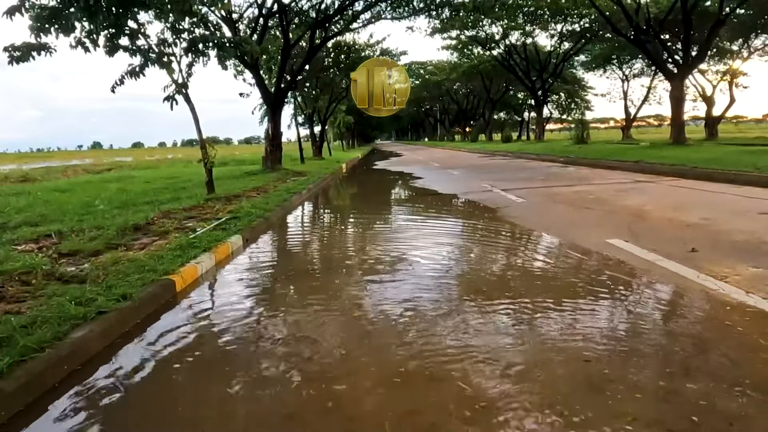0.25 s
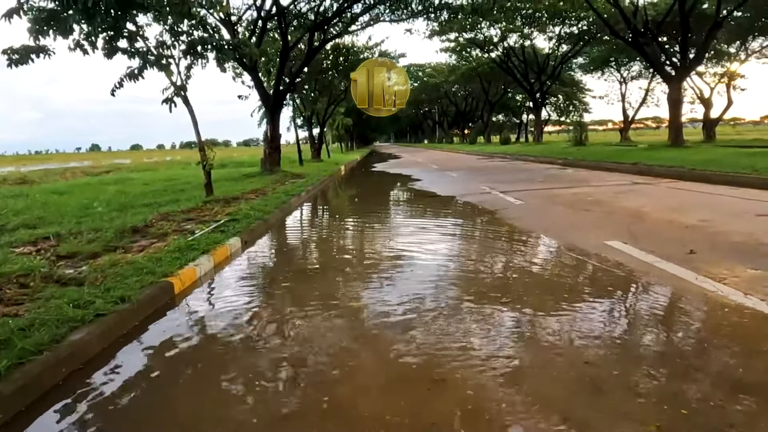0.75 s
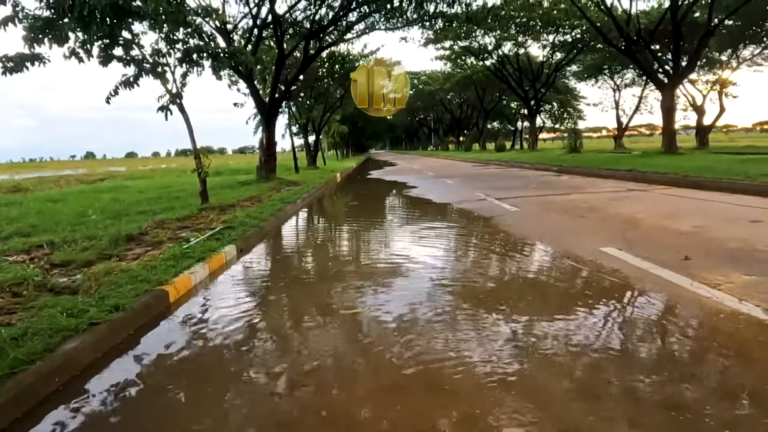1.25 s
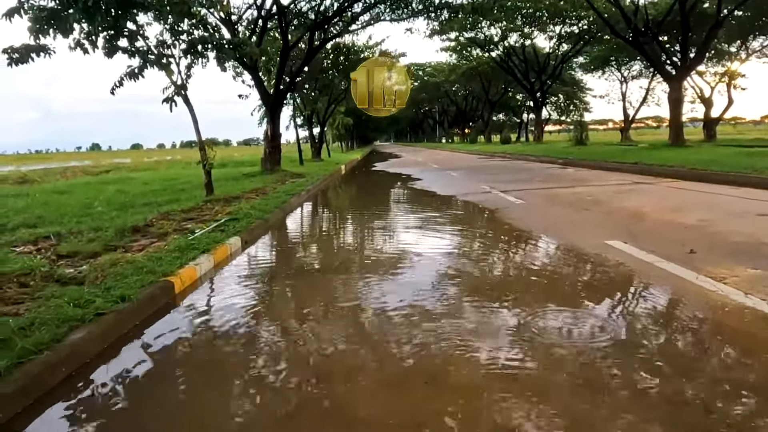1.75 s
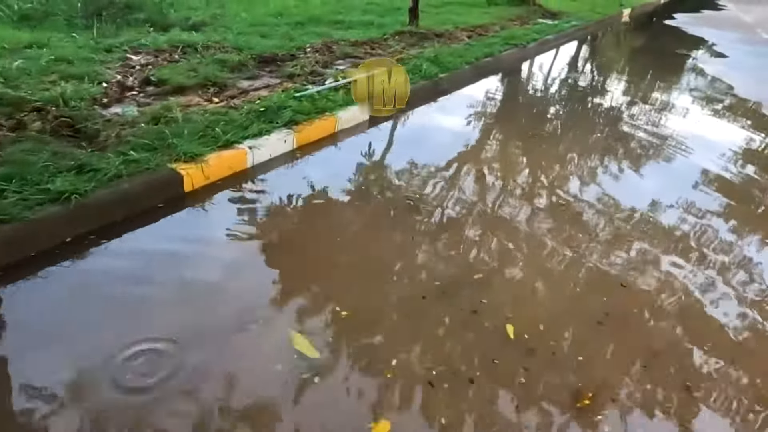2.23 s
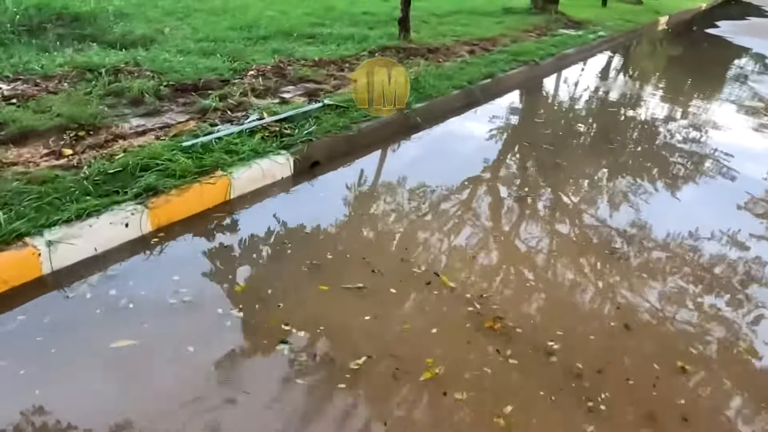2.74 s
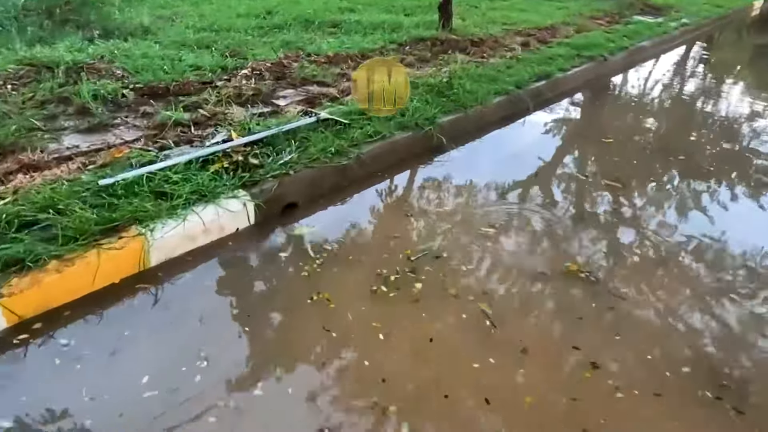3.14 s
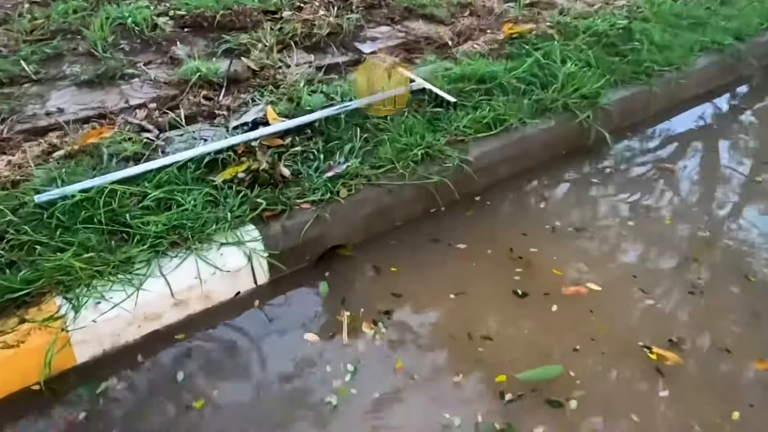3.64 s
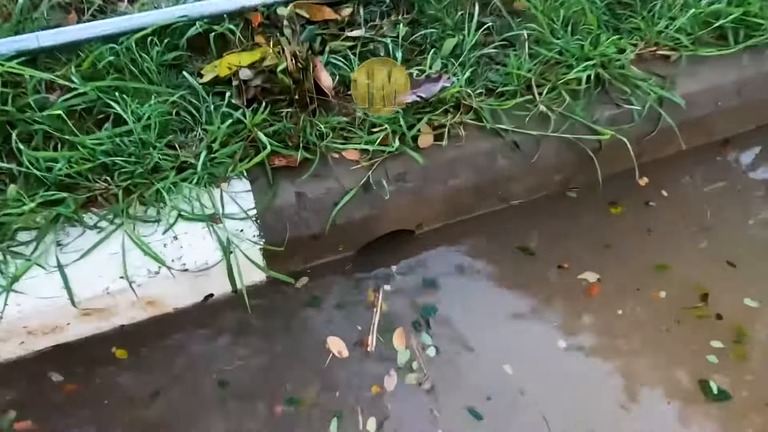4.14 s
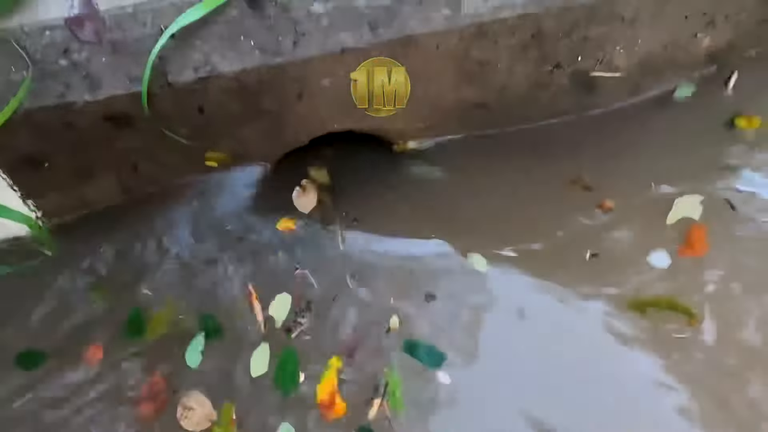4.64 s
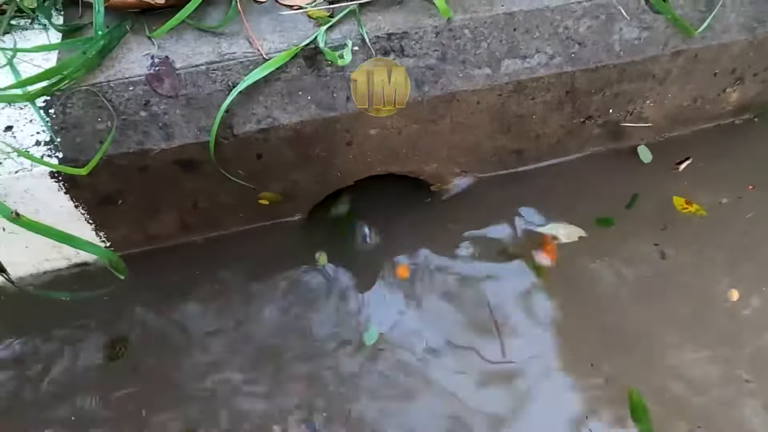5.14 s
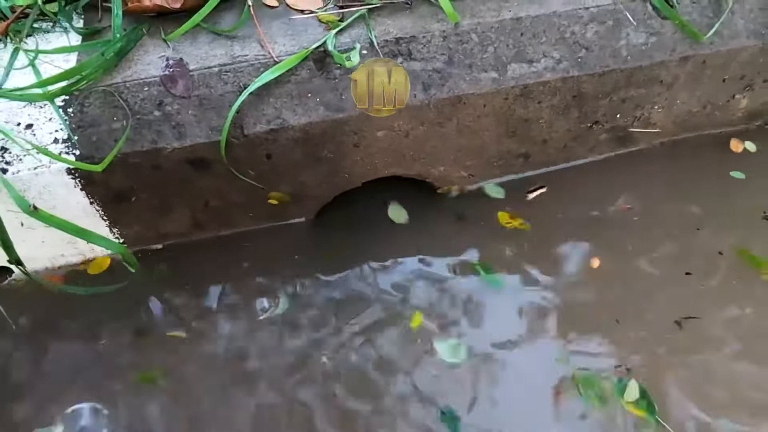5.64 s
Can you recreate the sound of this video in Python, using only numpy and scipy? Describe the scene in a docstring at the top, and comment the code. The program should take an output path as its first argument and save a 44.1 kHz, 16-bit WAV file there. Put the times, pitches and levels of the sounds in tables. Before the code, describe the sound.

Outdoors by a flooded road, low water rumbles steadily with a gulp and light plips. After a hard cut the sound thins, then swells as the microphone nears the drain hole. Splashing and bubbling peak midway, a few thin whistles peep, and finally a smooth low gurgling rush remains with soft high hiss and a high cricket. Close stereo, leaning right.

```python
"""Distant chirps and a thin tink open the scene, as floodwater runs along a kerb, heard from the road.
A whistle, gulps of swallowed air, splashes and a first cricket call follow, until a sudden break at 1.84 s.
Then, at the drain hole, the flow fades in and swells, amid more gulps, splashes, crickets and whistles.
Turbulence is shaped noise that rings pipe modes; bubbles are decaying, gliding sines; slaps are noise bursts."""
import sys
import numpy as np
from scipy import signal
from scipy.fft import rfft, irfft, next_fast_len
from scipy.io import wavfile
from scipy.ndimage import uniform_filter1d, map_coordinates

SR = 44100
rng = np.random.default_rng(int(sys.argv[2]) if len(sys.argv) > 2 else 0)


def to_wav(sig):
    """Store sig (one row per channel, or 1-D mono) as 16-bit WAV at the path in sys.argv[1].

    Samples outside -1..1 are clipped; the rate is SR.
    """
    pcm = np.clip(np.atleast_2d(sig), -1, 1) * 32767
    pcm = np.round(pcm).astype(np.int16)
    wavfile.write(sys.argv[1], SR, pcm.T)  # frames by channels


N = 259308

# Spectra of the dull rush from the road and at the kerb, the low churning and the burbling wash.
# Each row: frequency in Hz, relative power density in dB per Hz.
RUSH_ROAD = [(90, -12.5), (130, -2.5), (210, 2), (290, -3.5), (400, -1.5), (490, -10), (620, -12),
             (800, -27), (1100, -48), (1600, -95)]
RUSH_KERB = [(90, -23), (140, -0.5), (210, 0), (290, -3), (400, -4.5), (520, -10.5), (680, -12),
             (850, -30.5), (1100, -29), (1600, -85)]
CHURN_SPECTRUM = [(15, -18), (30, -6), (55, 6), (95, 11.5), (140, 10.5), (200, 4), (350, -58)]
WASH_SPECTRUM = [(450, -3.5), (750, 22), (1000, 11.5), (1300, -1.5), (1800, -50), (3000, -55), (6000, -75)]
# Spectra of the steady hiss from the two standpoints, and of the spray. Columns as above.
HISS_ROAD = [(1000, 27), (2100, -63), (2800, 4), (3500, 20), (4600, 20), (6200, 16.5), (7500, -8),
             (10000, -29), (16000, -5)]
HISS_KERB = [(1000, 12), (2200, 2), (2900, -6), (3500, -1), (4600, -5), (6000, -8.5), (7600, -3.5),
             (8600, -4.5), (9700, 0.5), (12500, -2.5), (13800, -3), (15500, -1)]
SPRAY_SPECTRUM = [(1500, -58), (2800, -6), (3700, 9.5), (5000, 7.5), (6500, 4), (8500, 5), (11500, 5),
                  (14000, 5), (16000, 0.5)]
# Air resonances of the drain pipe. Each row: frequency in Hz, bandwidth in Hz,
# relative strength from the road in dB, relative strength at the kerb in dB.
PIPE_MODES = [(149.5, 3.3, -58, 4.5), (220.9, 1.85, 10.5, -5), (347.2, 3.3, 13, 9.5), (420, 0.92, -42, -16),
              (433.8, 1.32, 15.5, 1.5), (590, 5.2, -38, -29), (694, 2.9, 4.5, -5.5), (1032, 10.5, -11, -16)]

# The moment of the break between the standpoints (s)
BREAK_S = 1.839
# Strength of the flow from the road (dB), then at the drain hole, where the flow fades in.
# Each row: time in seconds, strength in dB.
ROAD_DB = -37
KERB_FLOW = [(1.85, -63), (2.0, -58), (2.2, -46), (2.6, -43.5), (3.1, -40), (3.5, -38), (3.85, -38.5),
             (4.7, -36), (5.88, -36)]
# Random waver of the rush (dB)
WAVER_DB = .9
# Churning: its level (dB) at a flow of FULL_DB, and the dB it gains per dB of flow
FULL_DB = -37
CHURN_ROAD_DB, CHURN_KERB_DB, CHURN_GROWS = -40.5, -40.5, 0.5
# The wash relative to the strength of the flow (dB)
WASH_ROAD_DB, WASH_KERB_DB = -13.5, -11.5
# Surges of low churning. Each row: crest in seconds, gain at the crest in dB,
# time from crest to half amplitude in seconds.
SURGE_CRESTS = [(3.029, -27.5, 0.042), (3.16, -33, 0.08), (3.312, -28.5, 0.027), (3.427, -33, 0.082),
                (3.526, -24, 0.037), (3.684, -33, 0.03), (3.948, -26, 0.01), (4.334, -33, 0.036),
                (4.412, -25.5, 0.0091), (4.643, -28.5, 0.058), (5.047, -31, 0.026), (5.233, -35, 0.012),
                (5.745, -30.5, 0.035)]
# A surge's lift of the rush and of the wash (dB relative to its lift of the churning)
SURGE_RUSH_DB, SURGE_WASH_DB = -13, -45

# Steady hiss at the kerb. Each row: time in seconds, level in dB.
HISS_LEVEL = [(1.85, -68.5), (2.05, -68), (2.4, -69), (3.4, -67), (4.3, -59), (5.2, -51), (5.88, -54)]
# Wavelets lapping the kerb. Each row: crest in seconds, bubble gain in dB, spray gain in dB,
# nominal half length in seconds.
WAVELETS = [(1.215, -55.5, -56, 0.033), (1.372, -78, -60, 0.018), (1.444, -53, -56, 0.054),
            (1.66, -62, -53, 0.033), (2.16, -52, -54, 0.024), (2.264, -52.5, -59, 0.057),
            (2.403, -53, -50, 0.038), (2.496, -78, -44.5, 0.01), (2.579, -47, -44.5, 0.061),
            (2.784, -49.5, -47, 0.063), (3.003, -48, -48.5, 0.037), (3.13, -55, -55, 0.017),
            (3.245, -45, -44, 0.051), (3.447, -44.5, -47.5, 0.034), (3.569, -76, -47.5, 0.041),
            (3.699, -47, -47, 0.032), (3.808, -51, -49, 0.059), (3.92, -59, -56.5, 0.067),
            (4.104, -49.5, -56, 0.057), (4.238, -53, -80, 0.11)]
# A wavelet builds faster than it drains (shares of its half length)
WAVELET_RISE, WAVELET_FALL = 0.73, 1.06
# Fine froth between the wavelets. Each row: time in seconds, reference level in dB.
SIMMER_LEVEL = [(.9, -75), (1.1, -71), (1.35, -67.5), (1.82, -63), (1.86, -98), (2.06, -70), (2.2, -66),
                (2.9, -61), (3.4, -60.5), (4.4, -63), (5.88, -65.5)]
# Gains of the fine froth's bubbles and spray (dB relative to its reference level)
SIMMER_BUBBLES_DB, SIMMER_SPRAY_DB = -22, 2.5
# Stray drips, relative to the fine froth's reference and to a wavelet's bubble gain (dB)
DRIP_DB, DRIP_WAVELET_DB = -4, -17
# Spectrum of the patter of ticks. Each row: frequency in Hz, relative power density in dB per Hz.
PATTER_SPECTRUM = [(700, 5), (1400, 9.5), (2200, -2.0), (4000, 1.5), (6000, -7.0), (10000, -17)]

# Big swallowed bubbles. Each row: start in seconds, peak of the tone in dB, pitch in Hz, cycles to swell,
# fall in pitch while swelling in octaves, left minus right in dB.
GULPS = [(1.034, -20, 604, 2.1, 0.11, -2), (1.034, -19, 230, 1.1, 0, 4), (1.041, -32, 960, 2.4, 0.042, -1),
         (1.0455, -11.5, 600, 2.04, 0.25, 6), (1.056, -18.5, 550, 2.1, 0.32, -5),
         (2.995, -21, 283, 1.44, 0.019, -1), (3.301, -24.5, 270, 2.3, 0.14, -2),
         (3.324, -28, 790, 0.76, 0, -2), (3.338, -24, 450, 0.79, 0.055, 0),
         (3.371, -18.5, 302, 0.85, 0.15, -2), (3.403, -24, 760, 1.1, 0.14, -3),
         (3.413, -20.5, 330, 0.61, 0.075, -1), (3.432, -15.5, 1410, 0.53, 0.015, -1),
         (3.448, -17.5, 227, 0.62, .1, 0), (3.447, -18, 654, 1.13, 0.092, 0),
         (3.474, -19, 420, 2.14, 0.19, -1), (3.476, -26, 700, 1, 0.041, 4), (3.497, -39, 206, 1.6, 0, -4),
         (3.504, -21, 510, 1.2, 0.19, 0), (3.521, -23.5, 266, 1.6, 0.2, -2), (3.524, -22, 720, 0.77, 0, -3),
         (3.55, -26, 129, 0.51, .1, 0), (3.586, -18.5, 475, 0.85, 0.43, 0), (3.646, -34, 1400, 3.6, .08, 0),
         (3.656, -14.5, 165, 0.37, 0.082, 0.5), (3.665, -28, 720, 1.3, 0.11, 0)]
# Folds of water that trap a bubble cloud. Each row: crest in seconds, level in dB,
# nominal half length in seconds, middle pitch in Hz.
SLOSHES = [(1.046, -50, 0.013, 2000), (1.457, -52, 0.013, 2400), (3.053, -53.5, 0.027, 2000),
           (3.292, -50, .018, 1480), (3.331, -46, 0.012, 734), (3.494, -48, 0.011, 1550),
           (3.501, -38, 0.029, 616), (3.516, -39.5, 0.011, 1870), (3.548, -52, 0.013, 1390),
           (3.69, -60, 0.011, 1580), (3.771, -46.5, 0.017, 1880), (3.816, -45.5, 0.013, 2010),
           (4.055, -50, 0.01, 2620), (4.108, -45.5, 0.011, 3450)]
# Drops that trap a ringing bubble. Each row: impact in seconds, level in dB, pitch in Hz,
# life (decay by 40 dB) in seconds, upward glide over one life in octaves.
DROPS = [(1.032, -27.5, 1614, 0.017, 0.023), (1.061, -39, 1590, 0.022, 0), (1.216, -36, 2700, .007, 0.036),
         (1.233, -41, 4550, .012, .1), (1.316, -34.5, 4150, 0.015, 0.43), (1.403, -35.5, 6500, 0.0055, .2),
         (1.454, -34, 2310, .018, .1), (1.625, -30, 2990, 0.0055, 0), (1.675, -24, 2420, 0.0073, 0.19),
         (1.679, -23.5, 4420, 0.0055, 0.42), (2.174, -30, 3600, 0.0034, .11),
         (2.2245, -37, 1980, 0.0085, 0.079), (2.391, -21, 4160, .003, .1),
         (2.366, -26.5, 3430, 0.0087, 0.61), (2.377, -31, 3050, 0.0072, 0.35),
         (2.397, -23, 3680, 0.0086, 0.46), (2.597, -26.5, 4280, 0.0055, 0.31),
         (2.629, -28.5, 3330, 0.012, 0.062), (2.54, -37, 4170, 0.0036, .2), (2.574, -35, 2400, .005, 0.46),
         (2.744, -32, 3410, 0.006, 0.14), (2.774, -27, 3240, 0.0054, 0.0015), (2.84, -33, 3120, 0.0072, .2),
         (3.101, -35.5, 4870, .007, 0.064), (3.206, -25.5, 1550, 0.0052, 0), (3.228, -28, 3910, 0.0033, 0),
         (2.989, -12.5, 2330, 0.0018, 0.87), (3.24, -20.5, 4000, 0.0091, 0),
         (3.324, -31, 7300, 0.0048, 0.45), (3.378, -30.5, 4280, 0.011, 0.62),
         (3.432, -25, 1900, 0.0069, 0.19), (3.47, -35, 6500, 0.0086, .35), (3.485, -28, 3480, 0.0043, 0),
         (3.577, -28, 5980, 0.0037, .2), (3.656, -30, 5200, 0.0068, 0.42), (3.705, -24, 3660, 0.0058, 0.2),
         (3.736, -12.5, 1760, 0.007, 0.43), (3.741, -29, 1600, .008, .3), (3.763, -29, 2100, .008, .2),
         (3.786, -31, 1800, 0.01, .3), (3.817, -31, 2050, 0.0097, 0.064), (3.804, -23.5, 2270, 0.019, 1.2),
         (3.91, -28, 5130, 0.0083, 0.71), (3.922, -39.5, 2760, 0.05, 2), (3.882, -28, 4480, 0.0076, 0.18),
         (4.049, -38, 1730, 0.0069, 0.09), (4.059, -36, 6300, 0.0093, 0.086), (4.085, -34, 6200, 0.0033, 0),
         (4.104, -29, 3360, 0.01, 0.52), (4.118, -30.5, 3330, 0.016, 0.72),
         (4.128, -23.5, 2650, 0.009, 0.14), (4.129, -30, 1390, 0.012, 0.13), (4.171, -41, 9300, .005, 0),
         (4.178, -43, 8400, .004, .1), (4.188, -29.5, 2080, 0.018, 0.058),
         (4.1874, -23, 2930, 0.0058, 0.23), (4.379, -40.5, 3170, 0.021, 0.098),
         (4.886, -36.5, 3400, 0.0071, 0), (4.965, -32.5, 4400, 0.0038, 0.36),
         (5.074, -43.5, 3220, 0.021, 0.11), (5.43, -38.5, 3800, 0.0066, 0.76),
         (5.63, -44, 2100, 0.019, 1.2), (5.64, -41, 4000, .008, .3), (5.774, -40.5, 4300, .007, .2)]
# Slaps followed by scattering droplets. Each row: start in seconds, peak in dB, band centre in Hz,
# decay time of the scatter in seconds.
SPLASHES = [(1.038, -25.5, 13500, 0.0028), (1.187, -28.5, 12000, 0.0021), (1.04, -31, 4780, 0.0017),
            (1.382, -32, 11000, .002), (1.456, -35, 4200, .005), (1.675, -20, 10500, 0.0014),
            (2.175, -33.5, 5050, 0.0043), (2.309, -29, 9900, 0.0036), (2.392, -20, 6800, 0.0055),
            (2.4815, -39, 6000, .002), (2.499, -29, 8000, .002), (2.588, -30, 5960, 0.014),
            (2.778, -23, 7050, 0.023), (3.003, -30, 4500, 0.0067), (3.022, -27, 10100, .0071),
            (3.129, -23.5, 11000, 0.0047), (3.153, -30, 8600, .003), (3.241, -13, 6130, .003),
            (3.369, -18.5, 12000, 0.0055), (3.433, -21.5, 4150, 0.0027), (3.465, -23, 9050, 0.0033),
            (3.382, -23, 9000, 0.0019), (3.663, -23, 6600, 0.0052), (3.782, -26, 9500, .002),
            (3.804, -29, 4940, 0.012), (3.884, -30, 4870, 0.011), (4.128, -29, 3400, 0.0037),
            (4.188, -21, 2870, 0.00094), (4.991, -35, 13000, .002)]
# Droplets: rate (per s), spread of size (dB), decay time of one tick (s)
DROPLETS_PER_S, DROPLET_DB, TICK_S = 1100, 6.5, 0.00012
# Greatest random offset of one sound's spot: half of it to each side, in level (dB) and arrival time (s)
SPOT_DB, SPOT_S = 2.5, 0.000012
# Scale of the random offset of each bubble in a swarm: level (dB), arrival time (s)
BUBBLE_SPOT_DB, BUBBLE_SPOT_S = 4, .00003

# Crickets rubbing their wings. Each row: first stroke in seconds, end in seconds, level in dB,
# warmed-up pitch in Hz, Gaussian half length of a stroke in seconds.
CRICKETS = [(1.379, 1.896, -58.5, 10400, 0.0062), (2.295, 3.253, -55, 11400, .012),
            (4.735, 5.65, -47, 10680, 0.0068)]
# A call starts slow and flat: strokes to warm up (count), delay gathered (s), pitch gained (Hz)
WARM_STROKES, WARM_LAG_S, WARM_HZ = 2.3, .042, 860
# Spacing of the strokes before the gathered delay (s)
STROKE_GAP_S = .0583
# One stroke: climb each side of its middle (Hz), rasp's half-width at half amplitude (Hz), rasp level (dB)
STROKE_CLIMB_HZ, RASP_HZ, RASP_DB = 130, 480, -5
# The rasp has a weaker, lower side band (share of the pitch, dB)
SIDE_BAND, SIDE_BAND_DB = 0.87, -14
# Thin whistles of small creatures. Each row: start in seconds, length in seconds, level in dB,
# pitch in Hz, total slide in Hz, arch as a share of the pitch.
WHISTLES = [(0.887, .071, -67, 8600, -450, -.015), (3.995, .045, -56, 3980, 2, .06),
            (4.057, .04, -52, 3920, 80, 0.055), (4.131, .04, -53, 3970, 0, .03),
            (4.215, .04, -58, 3930, 0, .04)]
# Random waver (share of the pitch) and flutter (dB) of the whistles
WHISTLE_WAVER, WHISTLE_FLUTTER_DB = .012, 2
# Distant chirps. Each row: middle in seconds, level in dB, Gaussian half length in seconds.
FAR_CHIRPS = [(.04, -63, 0.018), (.1, -69, .03), (.215, -66, .026), (0.302, -65, .016), (0.373, -66, .022)]
# Band of the distant chirps. Each row: frequency in Hz, relative power density in dB per Hz.
FAR_BAND = [(3000, -60), (3380, -6), (3550, 0), (3750, -9), (4200, -60)]
# A thin tink: level (dB), time constant of its rise (s)
TINK_DB, TINK_RISE_S = -42.5, 0.005
# Modes of the tink. Each row: frequency in Hz, relative level in dB, time to decay by 60 dB in seconds.
TINK_MODES = [(6400, -9, .08), (8650, -17, .2), (9600, -10, 0.088), (11130, 2, 0.11), (12000, -11, .08),
              (12900, -9, .14)]

# Hiss and low rumble of the open air: levels (dB)
AIR_DB, RUMBLE_DB = -68, -49.5
# Their spectra. Each row: frequency in Hz, relative power density in dB per Hz.
AIR_SPECTRUM = [(500, 11), (1500, 6), (2200, 1), (2900, -2), (5000, 1), (8000, -7), (16000, -31)]
RUMBLE_SPECTRUM = [(15, -18), (32, -8), (50, -4), (80, -26), (160, -83)]

# Level difference of the two microphones. Each row: frequency in Hz, left minus right in dB.
LEAN = [(30, -1), (120, -6), (300, -4.5), (550, -7), (1000, -9), (2000, -12), (4000, -11.5), (8000, -8),
        (12000, -7), (16000, 0.5)]
# Phase lead of the left microphone. Each row: frequency in Hz, lead in radians.
LEAD = [(200, 0.09), (430, 0.0067), (950, 0.94), (2400, 1), (6100, 0.7), (7700, 0.9), (16000, 0)]
# Part of a wide source that differs between the sides. Each row: frequency in Hz, gain in dB.
APART = [(25, -8), (70, -15), (300, -19), (1000, -14), (4000, -10), (9000, -17)]
# Upper band limit (Hz)
TOP_HZ = 15900


def flow(flow_db, at_kerb):
    """Turbulence radiates broadband noise: rush, churning and wash follow the flow and its surges."""
    surge = surging()
    body = (1 - at_kerb) * noise(RUSH_ROAD) + at_kerb * noise(RUSH_KERB)
    ring = (1 - at_kerb) * pipe(column=2) + at_kerb * pipe(column=3)
    gurgle = swarm(hz=401.0, spread=0.36, cycles=6.2, scatter_db=3.0, glide=0.37, count=500, size=1500)
    rush_gain = together(amp(flow_db + WAVER_DB * wobble(14)), amp(SURGE_RUSH_DB) * surge)
    rush = rush_gain * (amp(3.0) * body + amp(-3.0) * ring + amp(-11.5) * gurgle)

    churn_db = (1 - at_kerb) * CHURN_ROAD_DB + at_kerb * CHURN_KERB_DB
    churn_db = churn_db + CHURN_GROWS * (flow_db - FULL_DB)
    eddies = amp(1.6 * np.tanh(wobble(26)))  # the churning swells and sinks within bounds
    churn = together(amp(churn_db) * eddies, surge) * noise(CHURN_SPECTRUM)

    wash_db = flow_db + (1 - at_kerb) * WASH_ROAD_DB + at_kerb * WASH_KERB_DB
    burble = swarm(hz=850, spread=0.184, cycles=17.6, scatter_db=0.5, glide=0.51, count=1500, size=600)
    wash_gain = together(amp(wash_db), amp(SURGE_WASH_DB) * surge)
    wash = wash_gain * (amp(-2.0) * noise(WASH_SPECTRUM) + amp(-7.5) * burble)
    return rush + churn + wash


def surging():
    """Amplitude modulation by surges: each gain is a smooth hump, and humps add in power."""
    t = np.arange(N) / SR
    return together(*[amp(db) / (1 + ((t - s) / half) ** 4) for s, db, half in SURGE_CRESTS])


def pipe(column):
    """Resonance: noise excites the pipe's air modes, with the strengths of one standpoint."""
    def response(f):
        total = 0
        for row in PIPE_MODES:
            hz, width = row[:2]
            total = total + amp(row[column]) * 1j * f * width / (hz ** 2 - f * f + 1j * f * width)
        return total
    return unit(filtered(wide_noise(), response))


def froth(at_kerb):
    """Entrained air and impacts: wavelets shed bubbles, drips, ticks and spiky spray over a hiss."""
    simmer_db, = curves(SIMMER_LEVEL)
    hiss_db, = curves(HISS_LEVEL)
    lap_bubbles, lap_spray = lapping()
    bubble_gain = together(lap_bubbles, amp(simmer_db + SIMMER_BUBBLES_DB))
    spray_gain = together(lap_spray, amp(simmer_db + SIMMER_SPRAY_DB))
    drip_gain = together(amp(simmer_db + DRIP_DB), amp(DRIP_WAVELET_DB) * lap_bubbles)

    road_hiss = amp(-62.0) * noise(HISS_ROAD)
    kerb_hiss = amp(hiss_db) * patchy(noise(HISS_KERB), depth_db=4.0)
    hiss = (1 - at_kerb) * road_hiss + at_kerb * kerb_hiss
    pops = swarm(hz=2774, spread=0.352, cycles=14.6, scatter_db=4.0, glide=0.57, count=4200, size=320)
    drips = swarm(hz=3690, spread=0.278, cycles=37, scatter_db=1.5, glide=0.31, count=300, size=900)
    ticks = patchy(wide_noise() * amp(7.5 * np.minimum(wobble(400), 1.9)), depth_db=4.5)
    patter = coloured(ticks, PATTER_SPECTRUM)
    # droplets land in small clumps
    spikes = amp(3.7 * np.minimum(wobble(900), 2) + 3.2 * np.tanh(wobble(90)))
    crackle = coloured(patchy(wide_noise() * spikes, depth_db=3.5), SPRAY_SPECTRUM)
    # single droplets tick apart
    flecks = swarm(hz=6200, spread=0.484, cycles=8.8, scatter_db=6.5, glide=0.2, count=520, size=200)

    bubbles = bubble_gain * (amp(-3.5) * pops + amp(-0.5) * patter)
    spray = spray_gain * (amp(0.5) * crackle + amp(-7.0) * flecks)
    return hiss + bubbles + drip_gain * drips + spray


def lapping():
    """Amplitude modulation by wavelets: bubble and spray gains build to a crest and drain away."""
    gains, t = np.zeros((2, N)), np.arange(-SR // 4, SR // 4) / SR
    for s, bubbles_db, spray_db, half in WAVELETS:
        length = half * np.where(t < 0, WAVELET_RISE, WAVELET_FALL)
        shape = np.exp(-np.abs(t / length) ** 1.13)
        add(gains[0], s + t[0], amp(bubbles_db) * shape)
        add(gains[1], s + t[0], amp(spray_db) * shape)
    return gains


def gulps(rough=0.054):
    """Large-cavity oscillation: air pockets swell and collapse in a few cycles, with a wet rattle."""
    out, t = np.zeros((2, N)), np.arange(SR // 6) / SR
    for s, db, hz, cycles, sag, lean_db in GULPS:
        u = t * hz / cycles  # 1 at the peak of the swell
        rattle = band_noise(len(t), hz, hz * 1.28)
        tone = np.sin(2 * np.pi * np.cumsum(hz * 2 ** (-sag * np.minimum(u, 2))) / SR)
        swell = u ** 2 * np.exp(2 * (1 - u))
        for track, side in zip(out, (.5, -.5)):
            add(track, s, amp(db + side * lean_db) * swell * (tone + rough * rattle))
    return out


def sloshes(spread=0.302, cycles=12, glide=0.29, scatter_db=5):
    """Superposition: each fold of water sheds 40 overlapping bubbles around one pitch."""
    out, t = np.zeros((2, N)), np.arange(SR // 25) / SR
    for s, db, half, hz in SLOSHES:
        cloud = np.zeros(SR // 4)
        for when, size, strength in np.clip(rng.standard_normal((40, 3)), -2, 2):
            pitch = hz * np.exp(spread * size)
            start = int(np.clip(len(cloud) / 2 + when * half * SR / 2, 0, len(cloud) - len(t)))
            cloud[start:start + len(t)] += amp(scatter_db * strength) * bubble(t, pitch, cycles / pitch, glide)
        level = np.sqrt(np.sum(cloud ** 2) / (2 * half * SR))  # rms over the nominal length
        out += placed(s - len(cloud) / SR / 2, amp(db) * cloud / level)
    return out


def drops(tick=0.2, rough=0.25):
    """Impact and resonance: a drop ticks and leaves one bubble, roughened by the moving water."""
    out, t = np.zeros((2, N)), np.arange(SR // 10) / SR
    for s, db, hz, life, glide in DROPS:
        shake = unit(uniform_filter1d(rng.standard_normal(len(t)), size=30))
        impact = band_noise(len(t), hz * 0.5, min(hz * 1.37, TOP_HZ)) * np.exp(-t / 0.0022)
        ring = bubble(t, hz, life, glide) * (1 + rough * shake)
        out += placed(s, amp(db) * (ring + tick * impact))
    return out


def splashes():
    """Impulsive excitation: a wavelet slaps down and throws droplets that tick on the surface."""
    out, t = np.zeros((2, N)), np.arange(SR // 10) / SR
    for s, db, hz, scatter in SPLASHES:
        landing = rng.random(len(t)) < DROPLETS_PER_S / SR
        sizes = amp(DROPLET_DB * np.minimum(rng.standard_normal(len(t)), 1))
        hits = (t == 0) + landing * sizes * np.exp(-t / scatter)  # the slap, then its droplets
        envelope = signal.lfilter([1], [1, -np.exp(-1 / (TICK_S * SR))], hits)
        low, high = min(hz * 0.43, SR / 4), min(hz * 1.83, TOP_HZ)
        burst = bandpass(rng.standard_normal(len(t)) * envelope, low, high)
        out += placed(s, amp(db) * burst / np.abs(burst).max())
    return out


def bubble(t, hz, life, glide):
    """Volume resonance: a bubble rings, decays and climbs in pitch as it nears the surface."""
    age = np.minimum(t / life, 2)
    tone = np.sin(2 * np.pi * np.cumsum(hz * 2 ** (glide * age), axis=-1) / SR)
    return tone * np.exp(-np.log(100) * age) * (1 - np.exp(-t * hz / 2))


def swarm(hz, spread, cycles, scatter_db, glide, count, size):
    """Superposition of bubbles at random times, pitches, strengths and spots; stereo, rms 1."""
    when, strength = rng.random((2, count))
    pitch = np.clip(hz * np.exp(spread * rng.standard_normal((count, 1))), 60, SR / 4)
    gain = amp(-scatter_db * np.log(strength + .03))[:, None]
    rings = bubble(np.arange(size) / SR, pitch, cycles / pitch, glide) * gain
    lean, lag = rng.uniform(-1, 1, (2, count, 1))

    def heard(side):
        starts = np.abs(when[:, None] * N + side * lag * BUBBLE_SPOT_S * SR).astype(int)
        samples = (starts + np.arange(size)).ravel()
        weights = (rings * amp(side * lean * BUBBLE_SPOT_DB)).ravel()
        return np.bincount(samples, weights, minlength=N)[:N]
    return unit(np.array([heard(0.62), heard(-.5)]))


def crickets(uneven_db=1):
    """Stridulation: each wing stroke is a rising tone in a rasp; a call warms up, holds, dies away."""
    out, t = np.zeros(N), np.arange(-SR // 20, SR // 20) / SR
    for start, end, db, full_hz, half in CRICKETS:
        for k in range(int((end - start) / STROKE_GAP_S)):
            cold = np.exp(-k / WARM_STROKES)
            s = start + k * STROKE_GAP_S + WARM_LAG_S * (1 - cold)
            hz = full_hz - WARM_HZ * cold

            def wing(f):
                main = 1 / (1 + ((f - hz) / RASP_HZ) ** 2)
                return main + amp(SIDE_BAND_DB) / (1 + ((f - hz * SIDE_BAND) / RASP_HZ) ** 2)
            rasp = amp(RASP_DB) * unit(filtered(rng.standard_normal(len(t)), wing))
            pitch = hz + STROKE_CLIMB_HZ * np.tanh(t / half)
            tone = (1 - cold) * np.sin(2 * np.pi * np.cumsum(pitch) / SR)
            fade = np.sqrt(np.clip((end - s) / 0.16, 0, 1))
            gain = amp(db + uneven_db * rng.standard_normal()) * fade
            add(out, s + t[0], gain * np.exp(-(t / half) ** 2 / 2) * (tone + rasp))
    return out


def whistles():
    """Frequency modulation: short thin notes arch, slide and waver."""
    out, waver, flutter = np.zeros(N), wobble(500), wobble(160)
    for s, length, db, hz, slide, arch in WHISTLES:
        u = np.linspace(-1, 1, int(length * SR))
        now = np.arange(len(u)) + int(max(s, 0) * SR)
        pitch = hz * (1 + arch * (1 / 3 - u ** 2) + WHISTLE_WAVER * waver[now]) + slide * u / 2
        gain = amp(db + WHISTLE_FLUTTER_DB * flutter[now]) * np.sqrt(1 - u ** 2)
        add(out, s, gain * np.sin(2 * np.pi * np.cumsum(pitch) / SR))
    return out


def far_chirps():
    """Blurring with distance: chirps in the verge become soft swells of one narrow noise band."""
    t = np.arange(N) / SR
    swells = [amp(db) * np.exp(-((t - s) / half) ** 2 / 2) for s, db, half in FAR_CHIRPS]
    return together(*swells) * noise(FAR_BAND)


def tink(blur=0.9):
    """Modal decay: a few high modes, blurred by random phase, die away from the start."""
    out, t = np.zeros(N), np.arange(SR // 5) / SR
    ring = np.zeros(len(t))
    for hz, db, t60 in TINK_MODES:
        phase = 2 * np.pi * hz * t + blur * wobble(400)[:len(t)]
        ring += amp(db - 60 * t / t60) * np.sin(phase)
    add(out, 0, amp(TINK_DB) * ring * (1 - np.exp(-t / TINK_RISE_S)))
    return out


def open_air():
    """Stationary noise: a faint even hiss and a faint low rumble."""
    return amp(AIR_DB) * noise(AIR_SPECTRUM) + amp(RUMBLE_DB) * noise(RUMBLE_SPECTRUM)


def microphones(x):
    """Interaural-style cues: the water lies to the right, so two ports differ in level and phase."""
    def response(hz):
        lean = along(LEAN, hz)
        share = 2 / (1 + amp(np.array([-lean, lean])))
        return share * np.exp(.5j * along(LEAD, hz) * np.array([[1], [-1]]))
    return filtered(x, response)


def placed(s, sound):
    """Stereo localisation: one sound at time s, from a random spot on the water."""
    lean, lag = rng.uniform(-1, 1, 2)
    sides = np.array([[1], [-1]]) / 2

    def response(hz):
        return amp(SPOT_DB * lean * sides) * np.exp(2j * np.pi * hz * SPOT_S * lag * sides)
    out = np.zeros((2, N))
    for track, side in zip(out, filtered(sound, response)):
        add(track, s, side)
    return out


def wide_noise():
    """Partial coherence: white noise from a broad stretch of water differs between the sides."""
    mid, side = rng.standard_normal((2, N))
    side = filtered(side, lambda hz: amp(along(APART, hz)))
    return np.array([mid + side, mid - side])


def noise(spectrum):
    """Spectral shaping: coloured stereo noise of rms 1, nearly alike on both sides."""
    return coloured(wide_noise(), spectrum)


def coloured(x, spectrum):
    """Linear filtering of x through a spectrum, scaled to rms 1."""
    return unit(filtered(x, lambda hz: amp(along(spectrum, hz))))


def patchy(x, depth_db):
    """Time-frequency modulation: short random patches, as every spurt of water has its resonances."""
    z = signal.stft(x, nperseg=256)[2]
    field = rng.standard_normal(z.shape[1:])
    field = uniform_filter1d(field, size=6, axis=0)
    field = uniform_filter1d(field, size=4, axis=1)
    return signal.istft(z * amp(depth_db * unit(field)), nperseg=256)[1][:, :N]


def bandpass(x, low, high):
    """Band limitation by a Butterworth filter between low and high in Hz."""
    return signal.sosfilt(signal.butter(2, [low, high], "band", fs=SR, output="sos"), x)


def band_noise(count, low, high):
    """Band-limited noise of rms 1."""
    return unit(bandpass(rng.standard_normal(count), low, high))


def filtered(x, response):
    """Convolution theorem: the spectrum of x times a response of frequency."""
    m = next_fast_len(x.shape[-1] + SR // 4)
    return irfft(rfft(x, m) * response(np.fft.rfftfreq(m, 1 / SR)), m)[..., :x.shape[-1]]


def together(*gains):
    """Incoherent addition: unrelated sounds add in power."""
    return np.sqrt(sum(g ** 2 for g in gains))


def wobble(rate):
    """Random modulation: a smooth curve through random knots, rate of them a second."""
    knots = rng.standard_normal(int(N * rate / SR) + 4)
    coarse = np.arange(0, N + 8, 8)
    return np.interp(np.arange(N), coarse, map_coordinates(knots, [coarse * rate / SR]))


def curves(rows):
    """Linear interpolation in time: one value per sample for each column after the time."""
    s, *cols = np.transpose(rows)
    return [np.interp(np.arange(N) / SR, s, c) for c in cols]


def along(points, hz):
    """Interpolation of (Hz, value) points on a logarithmic frequency axis."""
    f, v = np.transpose(points)
    return np.interp(np.log(hz + 1), np.log(f + 1), v)


def add(track, s, sound):
    """Superposition: mix a sound in at time s."""
    start = int(np.clip(s * SR, 0, N - 1))
    track[start:start + len(sound)] += sound[:N - start]


def amp(db):
    """Logarithmic level: decibels to amplitude gain."""
    return 10 ** (np.asarray(db) / 20)


def unit(x):
    """Normalisation to rms 1."""
    return x / np.sqrt(np.mean(x ** 2) + 1e-20)


def scene():
    """Superposition of the water, the life in the verge and the air, from two standpoints in turn."""
    at_kerb, = curves([(BREAK_S - .002, 0), (BREAK_S + .002, 1)])
    kerb_flow_db, = curves(KERB_FLOW)
    flow_db = (1 - at_kerb) * ROAD_DB + at_kerb * kerb_flow_db
    water = flow(flow_db, at_kerb) + froth(at_kerb) + gulps() + sloshes() + drops() + splashes()
    verge = crickets() + whistles() + far_chirps() + tink()
    return microphones(water + verge + open_air())


def record(dry):
    """Ideal low-pass: nothing above the band limit remains."""
    return filtered(dry, lambda hz: hz < TOP_HZ)


dry = scene()
out = record(dry)
to_wav(out)
```